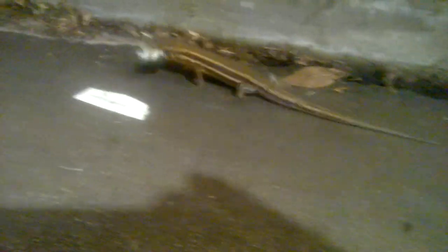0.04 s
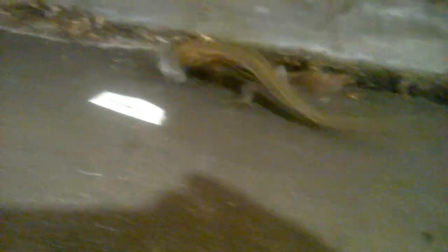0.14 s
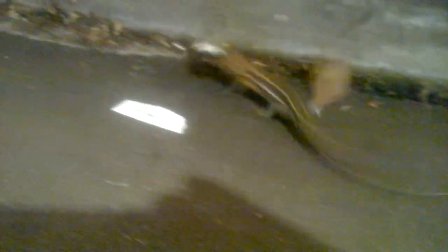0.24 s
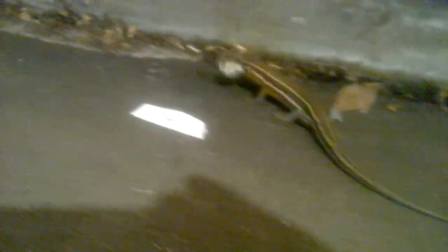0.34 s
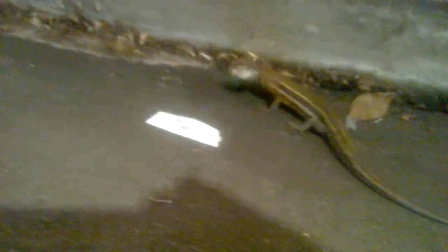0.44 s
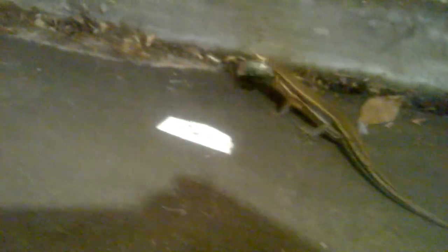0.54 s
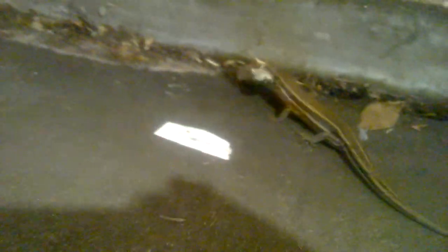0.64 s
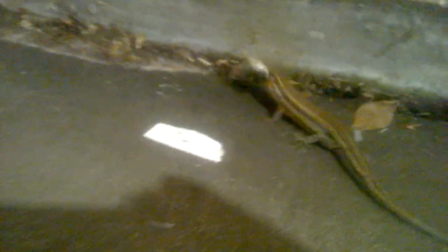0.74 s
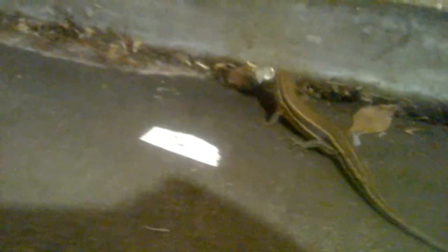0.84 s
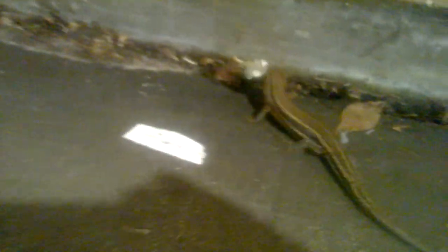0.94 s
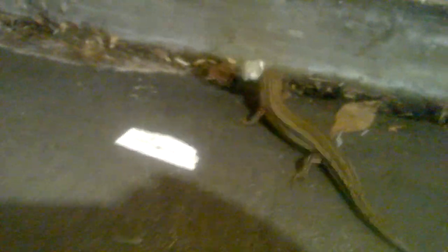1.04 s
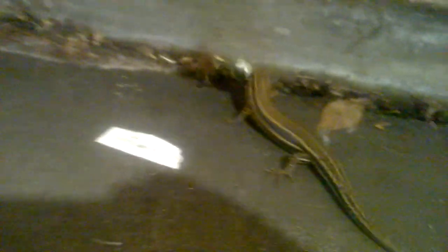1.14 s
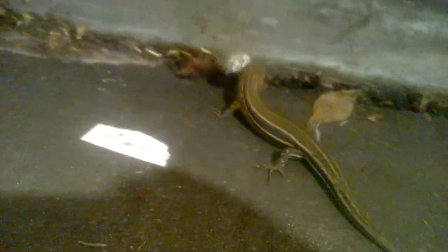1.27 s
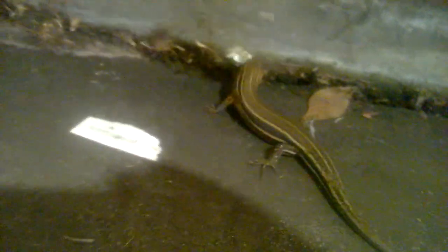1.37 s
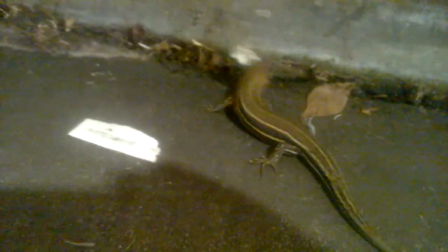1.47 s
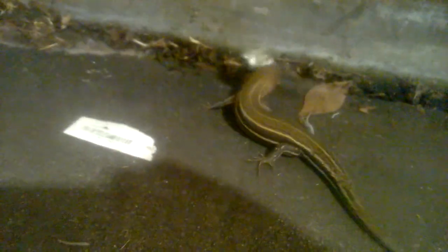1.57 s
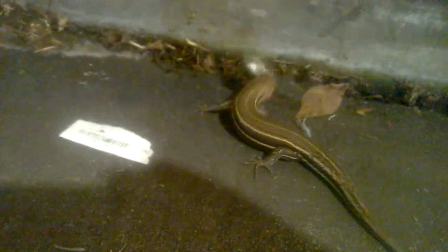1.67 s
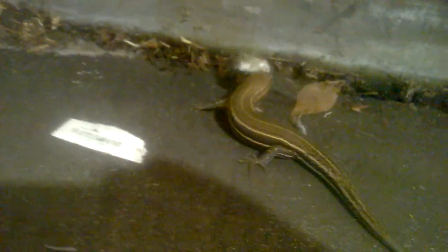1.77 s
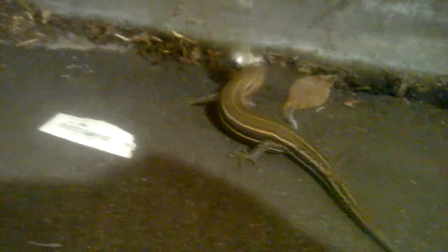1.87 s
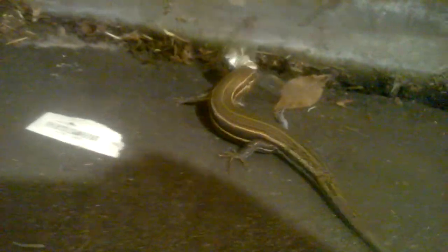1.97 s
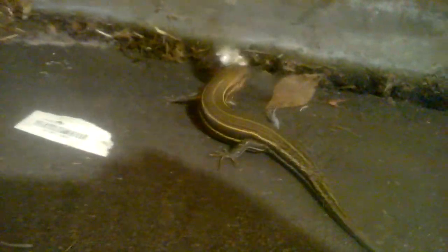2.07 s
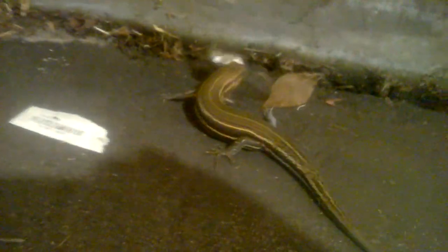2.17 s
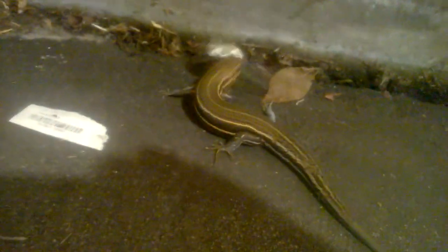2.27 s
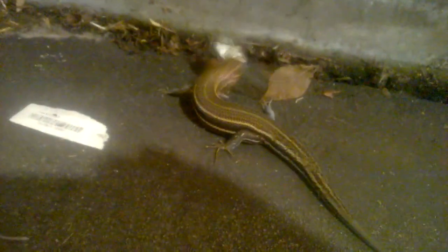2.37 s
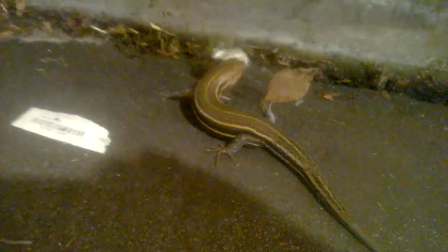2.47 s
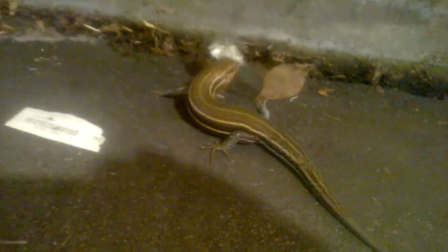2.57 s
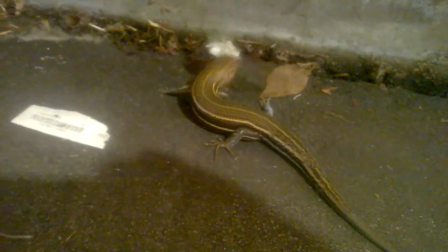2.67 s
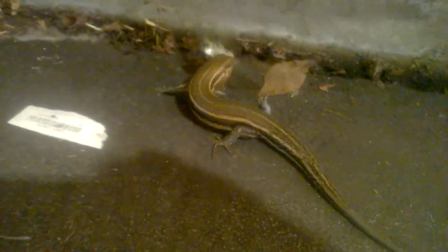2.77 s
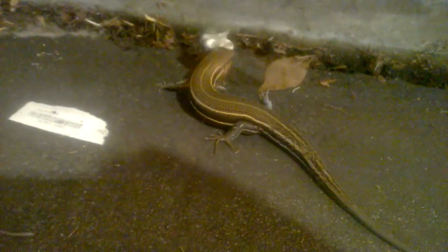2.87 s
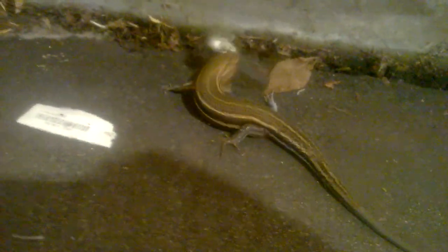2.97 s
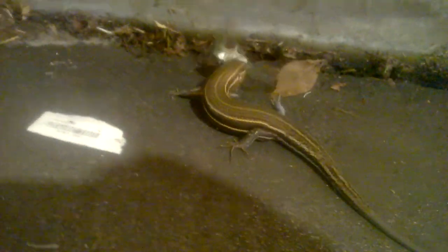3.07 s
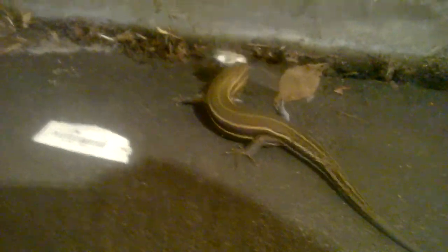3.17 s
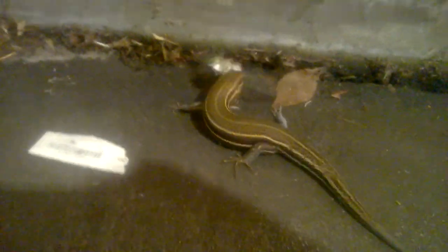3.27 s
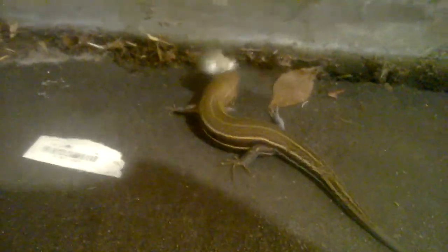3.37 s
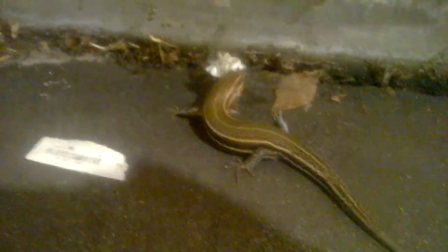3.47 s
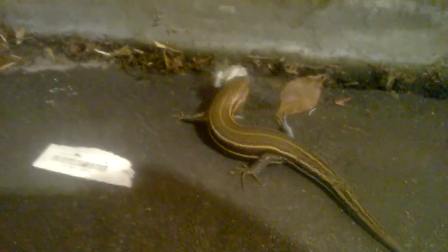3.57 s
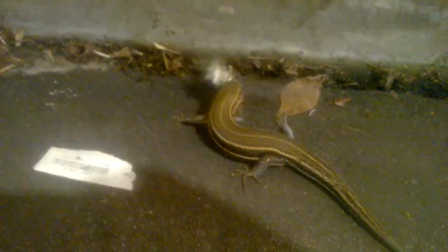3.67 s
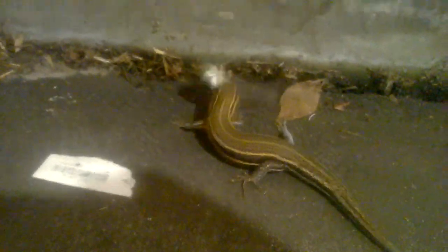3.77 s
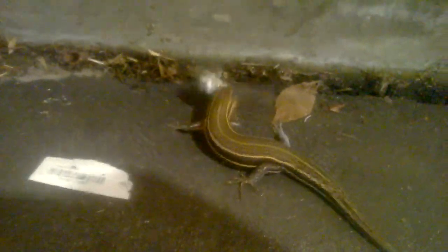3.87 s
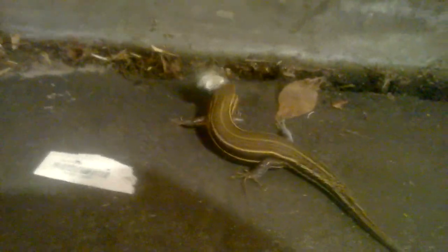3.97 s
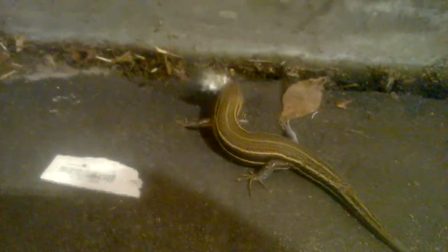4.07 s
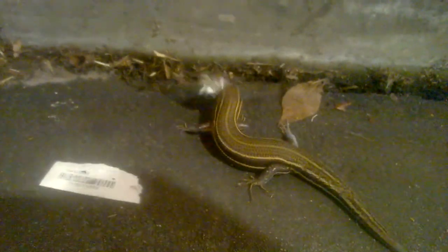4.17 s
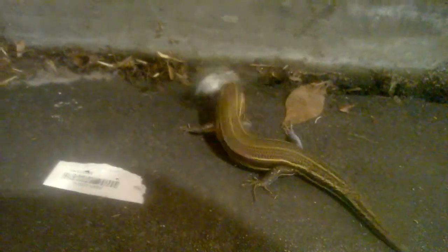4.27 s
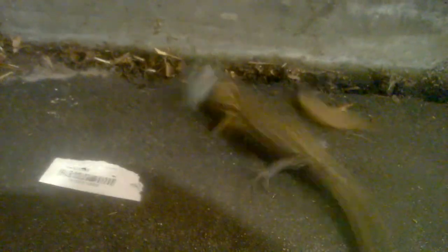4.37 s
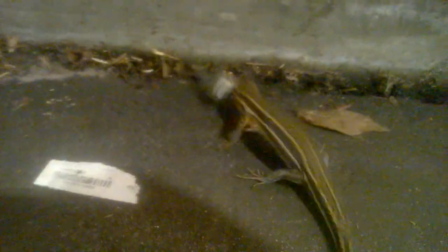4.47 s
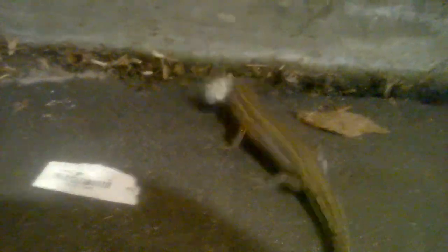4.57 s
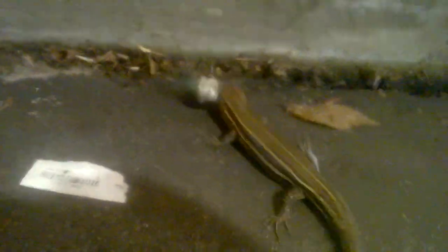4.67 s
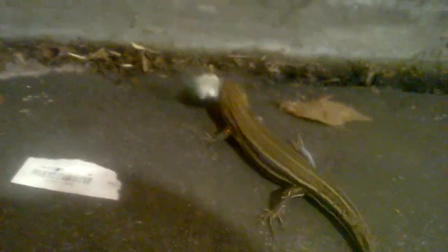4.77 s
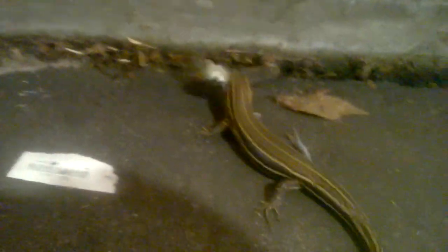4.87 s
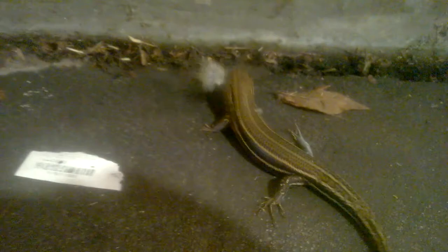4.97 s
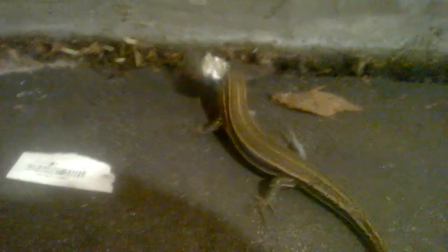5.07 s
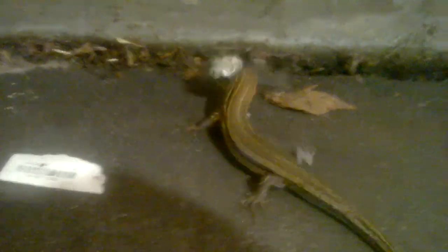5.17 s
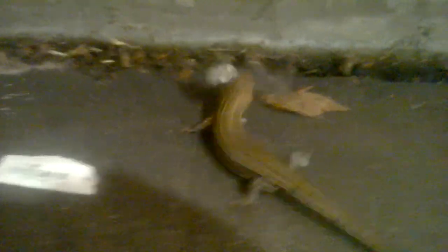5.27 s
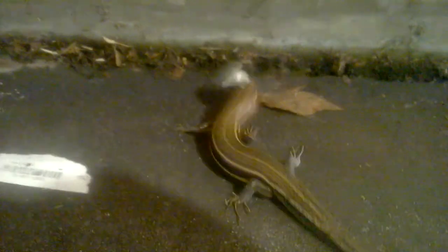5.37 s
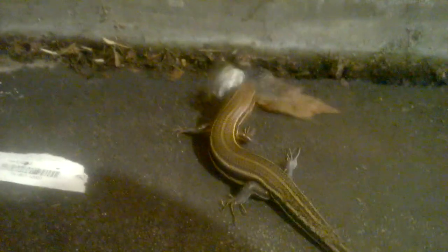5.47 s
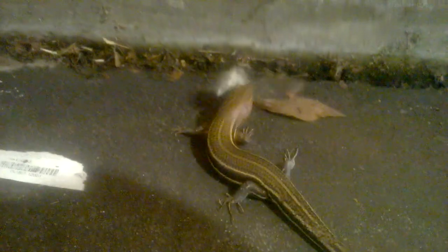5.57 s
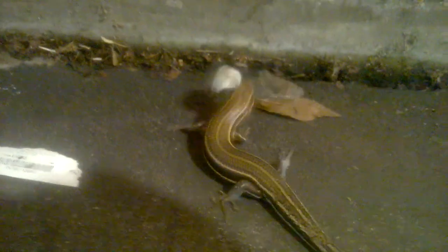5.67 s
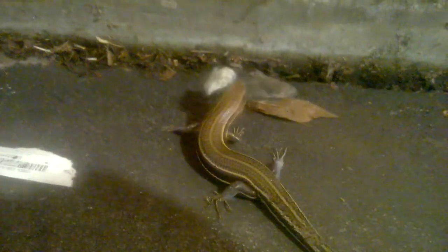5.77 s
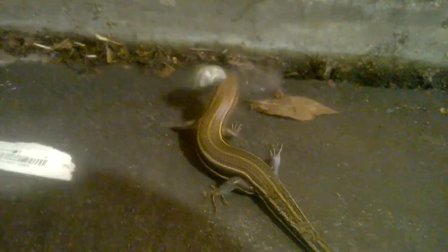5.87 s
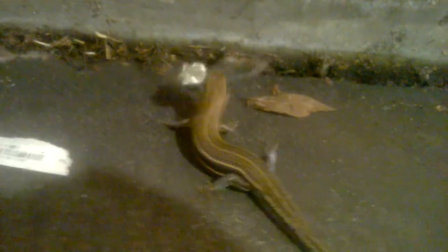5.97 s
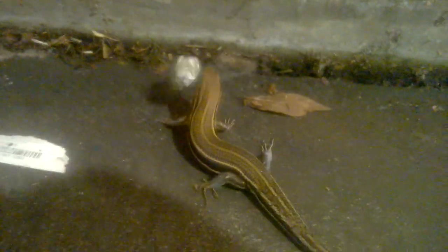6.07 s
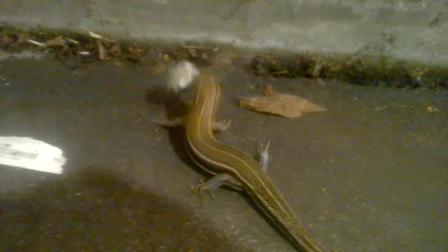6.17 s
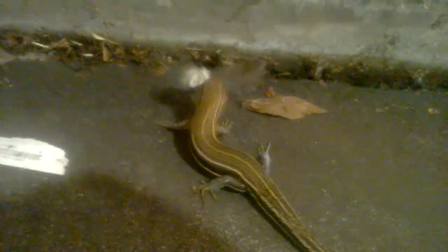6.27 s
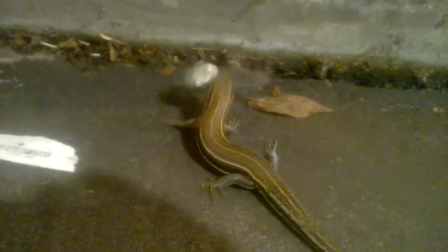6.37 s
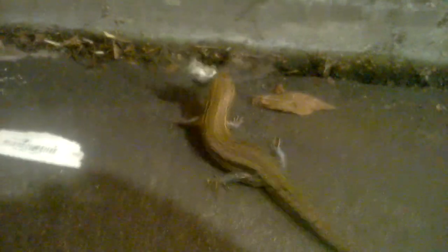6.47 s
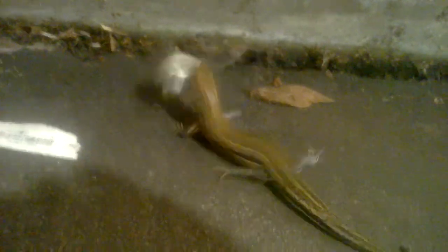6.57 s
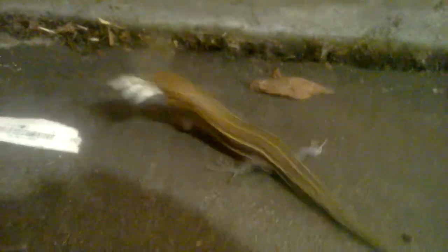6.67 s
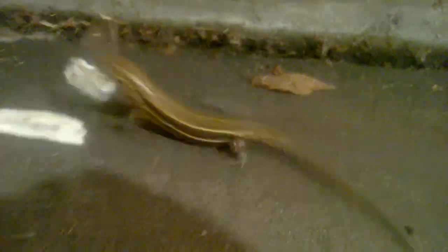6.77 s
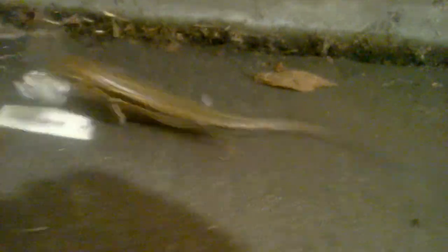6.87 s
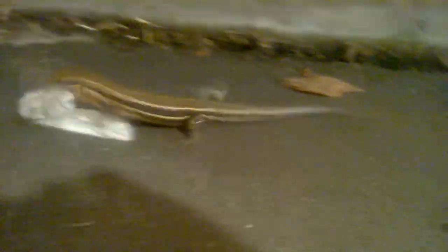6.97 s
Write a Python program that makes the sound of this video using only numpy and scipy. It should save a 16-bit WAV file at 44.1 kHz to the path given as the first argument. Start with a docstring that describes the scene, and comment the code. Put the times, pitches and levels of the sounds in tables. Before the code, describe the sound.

A small lizard thrashes brittle prey on concrete with hard cracks and gritty scrapes, then nips it in rapid crisp crunches over faint wind rumble.

```python
"""A small lizard shoves and bites brittle prey along a concrete step at night.
It first thrashes: hard fracture bursts, grit scraping and dull bumps; loose snaps follow, then a run of nips.
Each nip is a crunch, a rub and a second crunch. A second thrash comes past 4 s, then more snaps and nips.
Noise taps add a short bright tail throughout, over filtered-noise wind rumble, a few deep puffs and hiss."""
import sys
import numpy as np
from scipy import signal
from scipy.fft import rfft, irfft, next_fast_len
from scipy.io import wavfile
from scipy.ndimage import uniform_filter1d

SR = 44100
rng = np.random.default_rng(int(sys.argv[2]) if len(sys.argv) > 2 else 0)


def store_wav(level_fs):
    """Save 16-bit WAV to argv[1]."""
    pcm = np.round(np.clip(np.atleast_2d(level_fs), -1, 1) * 32767)
    wavfile.write(sys.argv[1], SR, pcm.T.astype(np.int16))


N = 310464  # samples

# Nips of the jaws. Each row: strike in seconds, grip in seconds, strike level in dB, release level in dB
# (both before a common trim), pitch in Hz of the piece that gives.
NIPS = [(.596, 0.031, -46.5, -46.5, 2800), (.749, .019, -54, -48.5, 5030), (1.462, .016, -50, -51.5, 4270),
        (1.546, 0.024, -50.5, -46.5, 4250), (1.637, .018, -51.5, -42.5, 3980),
        (1.685, 0.025, -49, -45.5, 3800), (1.84, 0.021, -50, -50.5, 5200),
        (1.918, 0.027, -40.5, -49.5, 3960), (2.067, .019, -49.5, -44, 4000),
        (2.145, 0.039, -43.5, -47, 3600), (2.237, 0.022, -40.5, -46.5, 3600),
        (2.318, 0.021, -45, -46.5, 3800), (2.379, 0.017, -42.5, -46, 3460),
        (2.517, 0.019, -47.5, -46.5, 3700), (2.559, 0.02, -41.5, -45, 3680), (2.661, 0.027, -46, -43, 4000),
        (2.794, 0.013, -51, -41.5, 4020), (2.874, .022, -46.5, -46, 3800), (2.982, .025, -45.5, -46, 3850),
        (3.162, 0.023, -44, -45.5, 4100), (3.405, 0.022, -44, -41.5, 2700),
        (3.647, 0.024, -45.5, -48.5, 2100), (5.15, 0.019, -40, -47, 4300), (5.477, 0.01, -46, -49.5, 4500),
        (5.533, 0.031, -43, -49, 2550), (5.608, .019, -44.5, -44, 3900), (5.637, .029, -40, -46, 2080),
        (5.741, 0.019, -43, -44.5, 3770), (5.837, 0.021, -43.5, -45, 2150), (5.923, 0.014, -46, -44, 1880),
        (6.132, 0.014, -46, -44.5, 1830), (6.212, .014, -40, -46.5, 1650), (6.298, 0.016, -45, -47, 4970),
        (6.421, 0.017, -50, -48.5, 2160), (6.625, 0.016, -44, -40.5, 4060),
        (6.671, 0.014, -36.5, -43, 3600), (6.81, 0.015, -47, -47, 3820), (6.853, .013, -43, -46, 3900),
        (6.9, 0.015, -48, -48, 3680)]
# Single snaps of shell. Each row: peak in seconds, level in dB before the same trim, pitch in Hz,
# fizz in dB over the body.
SNAPS = [(.1335, -38, 3940, -11), (0.1791, -19.5, 3700, 4.5), (0.1843, -18.5, 1800, -1.5),
         (0.2272, -17.5, 2360, -5), (0.456, -40.5, 4850, -7.5), (.5, -35, 4860, -6.5),
         (0.541, -41.5, 4420, 0.5), (0.826, -47.5, 4140, -1), (0.8741, -36.5, 4550, -3.5),
         (.977, -45, 2440, -14), (1.072, -50, 2660, 0), (1.153, -45, 3870, -12), (1.818, -51, 2500, -4),
         (2.761, -40.5, 3340, -13), (3.234, -48, 3800, 1), (3.328, -45.5, 4700, -12),
         (3.3777, -35.5, 2660, -7.5), (3.687, -39.5, 4400, -5.5), (3.752, -52, 5300, -5),
         (3.871, -48.5, 5300, -18), (3.964, -46, 3900, -1.5), (4.128, -36.5, 2140, -8.5),
         (4.25, -49, 5300, -16), (4.285, -49, 4000, -4.5), (4.4035, -24, 3900, -1.5),
         (4.4442, -22, 2750, -0.5), (4.5011, -34.5, 4600, -3), (4.525, -41.5, 5000, 5),
         (4.692, -48, 3100, -8), (4.755, -32, 2170, -3), (4.798, -43.5, 3860, 1), (4.859, -51.5, 4070, -4),
         (5.0478, -41, 4050, -3.5), (5.266, -41.5, 4770, -11), (5.752, -40, 2200, -14),
         (6.0383, -50.5, 4230, -8), (6.498, -45, 4650, -10), (6.579, -49, 5170, -10),
         (6.5992, -34, 4600, -8), (7.012, -37, 3330, -11.5)]
# Fizz of the nips, rising and falling over time, before the strike and release offsets.
# Each row: time in seconds, fizz in dB over the body.
CRISPNESS = [(.6, -5.5), (1.6, 0.5), (2.3, 1.5), (2.6, -3), (3.3, -3), (5.5, 1), (6, -10), (6.9, -1)]
# Rubs and drawn-out dull crunches of the prey. Each row: middle in seconds, level in dB before a trim,
# length in seconds, fizz in dB over the body.
RUBS = [(.01, -56.5, 0.028, -14), (.075, -66.5, 0.034, -2.5), (0.161, -39, 0.0088, -13),
        (0.21, -40.5, 0.0073, -14), (0.328, -44, 0.011, -3.5), (0.419, -60, 0.021, -3),
        (1.02, -62, 0.014, 3.5), (1.195, -63.5, 0.085, -0.5), (1.353, -58.5, 0.04, -5),
        (1.71, -57, 0.027, 4), (1.975, -61.5, 0.013, 5), (2.157, -62.5, 0.089, 0), (3.057, -61, 0.063, -1),
        (3.361, -60.5, 0.014, 4), (3.791, -67, 0.035, -2), (3.92, -61.5, 0.011, -6), (4.068, -65, .03, -5),
        (4.313, -61, 0.014, 2), (4.371, -42.5, 0.006, -15), (4.384, -40.5, 0.0073, -8),
        (4.456, -33.5, 0.0075, -7.5), (4.7, -64.5, .22, -4), (4.967, -64, 0.049, -5),
        (5.215, -56, 0.031, -9), (5.308, -57, .06, -6), (5.411, -55.5, 0.031, -3), (5.542, -51, 0.014, -6),
        (5.649, -61, 0.028, -4), (5.836, -52.5, 0.0098, -17), (6.064, -60.5, .02, -12),
        (7.03, -55, 0.018, -3)]
# Treble let out as the head turns to the step and away. Each row: time in seconds, gain in dB.
FACING = [(.25, -1), (.5, -10), (1.1, -1), (1.5, -7), (2, -11), (2.6, -1.5), (2.95, -8), (4.4, 2.5),
          (4.7, -6), (6.2, 5.5), (7, -0.5)]
# Scraping while the lizard thrashes, one list a bout. Each row: time in seconds, level in dB.
SCUFFLES = [
    [(.14, -44), (.16, -50), (.2, -45), (.22, -45), (.24, -36), (.257, -35.5), (.29, -60)],
    [(4.362, -50), (4.385, -45.5), (4.413, -38), (4.432, -51), (4.455, -39), (4.483, -52), (4.515, -44.5),
     (4.55, -52.5)],
]
# Body and prey bumping the ground. Each row: peak of the push in seconds, level in dB, nominal length in seconds,
# pitch in Hz.
BUMPS = [(0.179, -34.5, 0.0036, 1130), (0.226, -43, 0.004, 1300), (4.446, -47.5, 0.0056, 240),
         (4.451, -47.5, 0.018, 700), (5.209, -55.5, 0.037, 670), (6.686, -46.5, 0.0074, 1270)]
# Puffs of wind on the microphone. Each row: peak in seconds, level in dB.
PUFFS = [(1.575, -50.5), (2.325, -47.5), (5.855, -44), (6.37, -45)]
# Filter shapes of shell, breaking edges, grit, wind, hiss and tail; overall level is set elsewhere.
# Each row: frequency in Hz, relative gain in dB.
SHELL_SHAPE = [(150, -10.5), (500, -24), (850, -13), (1250, -2.5), (1750, 1.5), (2700, 0), (4000, 1),
               (5300, 1.5), (6200, -5), (7200, -7.5), (9000, -34.5)]
EDGE_SHAPE = [(4500, -52), (6800, -9), (8200, 2), (9800, 1.5), (11200, -3), (13000, -6), (16000, -4)]
GRIT_SHAPE = [(200, -23.5), (600, -18.5), (1100, -11), (1750, -1.5), (2700, -5), (4200, -8.5), (5400, -10),
              (6400, -18), (8400, -6), (12000, -7.5), (16000, -11)]
RUMBLE_SHAPE = [(8, -15), (21, -4.5), (40, -5.5), (64, 1), (74, -7.5), (81, 3), (93, -10), (110, -0.5),
                (130, -2.5), (143, -15), (200, -18), (400, -29.5), (1000, -77)]
HISS_SHAPE = [(60, 8), (300, 1), (430, 0), (780, 4), (1150, -1), (1600, -4.5), (2600, -6.5), (4200, -4.5),
              (6500, -8), (10000, -23), (16000, -20)]
TAIL_SHAPE = [(200, 8), (900, -0.5), (1700, -4), (2700, 0.5), (3300, -2), (3800, 3.5), (4700, -6.5),
              (7000, 6), (8700, 4), (10500, 3.5), (13000, 0.5), (16000, 4.5)]
# Decay of the tail. Each row: frequency in Hz, time in seconds to fall 60 dB.
TAIL_DECAY = [(300, 0.13), (1800, 0.093), (4000, 0.19), (9000, 0.12), (15000, 0.093)]

STRIKE_FIZZ_DB, RELEASE_FIZZ_DB = -2, 2.5  # added to CRISPNESS
GRIP_DB, GRIP_SHARE, GRIP_FIZZ_DB = -12.5, 1.2, 0  # level re mean crunch, length re grip, fizz re CRISPNESS
BAND_LIMIT_HZ = 15800


def amp(db):
    """Decibels to amplitude."""
    return 10 ** (np.asarray(db) / 20)


def unit(x):
    """Scale to an RMS of 1."""
    return x / np.sqrt(np.mean(x ** 2) + 1e-20)


def track(points, t_s):
    """Interpolate a table linearly over time."""
    return np.interp(t_s, *np.transpose(points))


def read(points, hz):
    """Interpolate a table on a log-frequency axis."""
    f_hz, value = np.transpose(points)
    return np.interp(np.log(hz + 1), np.log(f_hz + 1), value)


def add(mix, start_s, sound):
    """Mix a sound in place, cut at the end of the mix."""
    part = mix[max(round(start_s * SR), 0):][:len(sound)]
    part += sound[:len(part)]


def colour(x, shape, ring_hz=1000, ring_db=0, ring_share=.1):
    """Minimum-phase filter: a shape plus one resonance, so that clicks start sharply and ring out."""
    size = 2 * next_fast_len(len(x))
    hz = np.fft.rfftfreq(size, 1 / SR)
    detune = (hz - ring_hz) / (ring_share * ring_hz)
    ring = 1 + (amp(ring_db) - 1) / (1 + detune ** 2)
    cepstrum = irfft(np.log(amp(read(shape, hz)) * ring))
    # folding the cepstrum makes the filter causal
    cepstrum[1:size // 2] *= 2
    cepstrum[size // 2 + 1:] = 0
    return irfft(rfft(x, size) * np.exp(rfft(cepstrum)))[:len(x)]


def fractures(per_s, spread_db, size):
    """Sparse impulses of either sign; sizes are exponential in dB, so most are small and a few large."""
    chance, sign, strength = rng.random((3, size))
    size_db = spread_db * np.minimum(-np.log(1 - strength), 3.5)
    return (chance < per_s / SR) * np.sign(sign - .5) * amp(size_db)


def swell(t_s, length_s, rise, fall):
    """Stress grows exponentially to a peak at t = 0 and dies away; rise and fall are shares of the length."""
    return np.exp(np.where(t_s < 0, t_s / (rise * length_s), -t_s / (fall * length_s)))


def bites(trim_db=-1.67):
    """Each nip crunches twice, dull as the jaws strike, crisp as they let go; single pieces snap too."""
    blows = list(SNAPS)
    for s, grip_s, strike_db, release_db, hz in NIPS:
        crisp_db = track(CRISPNESS, s)
        blows.append((s, strike_db, hz, crisp_db + STRIKE_FIZZ_DB))
        blows.append((s + grip_s, release_db, hz, crisp_db + RELEASE_FIZZ_DB))
    out = np.zeros(N)
    for s, db, hz, fizz_db in blows:
        lead_s, sound = crunch(db + trim_db, hz, fizz_db)
        add(out, s - lead_s, sound)
    return out


def crunch(db, hz, fizz_db, size=2048):
    """A cluster of fractures rings one piece of shell; the breaking edges fizz above it."""
    lead_s = .012
    # hard snaps are brief, fizzy ones drawn out
    length_s = 0.0042 * np.exp(0.022 * fizz_db - 0.032 * (db + 47.5))
    t_s = np.arange(size) / SR - lead_s
    snaps = swell(t_s + 0.22 * length_s, length_s, rise=0.25, fall=0.88)
    snaps = snaps * fractures(per_s=6800, spread_db=5.0, size=size)
    splinters = swell(t_s + 0.16 * length_s, length_s, rise=0.31, fall=0.63)
    splinters = splinters * fractures(per_s=13000, spread_db=1.0, size=size)
    body = unit(colour(snaps, SHELL_SHAPE, ring_hz=hz, ring_db=9.0, ring_share=0.11))
    edge_hz = rng.uniform(9100, 13000)
    fizz = unit(colour(splinters, EDGE_SHAPE, ring_hz=edge_hz, ring_db=1, ring_share=0.122))
    level = amp(db) * np.sqrt(length_s * SR / size)  # energy follows length
    return lead_s, level * (body + amp(fizz_db) * fizz)


def crumbs(level_db=-58, fizz_db=-5, spread_db=5, early_s=.04, late_s=0.076, count=130):
    """Claws and flakes tick faintly, as small crunches at random around the nips and snaps."""
    out = np.zeros(N)
    moves_s = [row[0] for row in NIPS + SNAPS]
    for move, delay, size, piece, edge in rng.random((count, 5)):
        tick_db = level_db + spread_db * (2 * size - 1)
        lead_s, tick = crunch(tick_db, 1600 + 3600 * piece, fizz_db + 14 * (edge - .5))
        s = moves_s[int(move * len(moves_s))] - early_s + delay * (early_s + late_s)
        add(out, s - lead_s, tick)
    return out


def rustle(trim_db=3.5):
    """The prey rubs or crunches dully at listed times, and rubs in the jaws around the end of every grip."""
    out = np.zeros(N)
    for s, db, length_s, fizz_db in RUBS:
        add(out, *rub(s, db + trim_db, length_s, fizz_db, rng.uniform(1700, 4710)))
    for s, grip_s, strike_db, release_db, hz in NIPS:
        grip_db = (strike_db + release_db) / 2 + GRIP_DB
        fizz_db = track(CRISPNESS, s) + GRIP_FIZZ_DB
        add(out, *rub(s + grip_s, grip_db, GRIP_SHARE * grip_s, fizz_db, hz))
    return out


def rub(s, db, length_s, fizz_db, hz, clump_db=5.0, size=16384):
    """A spindle of fine grains that catch and slip in clumps, ringing one piece of shell."""
    t_s = (np.arange(size) - size // 2) / SR
    clumps = amp(clump_db * unit(uniform_filter1d(rng.standard_normal(size), size=260)))
    spindle = np.exp(-np.pi / 2 * (t_s / length_s) ** 2)
    grains = fractures(per_s=9900, spread_db=5.0, size=size) * clumps * spindle
    body = unit(colour(grains, SHELL_SHAPE, ring_hz=hz, ring_db=9.0, ring_share=0.097))
    fizz = unit(colour(grains, EDGE_SHAPE))
    sound = amp(db) * np.sqrt(length_s * SR / size) * (body + amp(fizz_db) * fizz)
    return s + t_s[0], sound[s + t_s >= 0]  # drop what falls before time zero


def shade(x):
    """The lizard's head and the step shadow the shortest waves: a moving gain above 11.5 kHz."""
    top = signal.oaconvolve(x, signal.firwin(31, 11500, pass_zero=False, fs=SR), "same")
    return x + top * (amp(track(FACING, np.arange(N) / SR)) - 1)


def scuffle():
    """Scales and prey drag over grit: dense grains under each stroke."""
    t_s = np.arange(N) / SR
    force = np.zeros(N)
    for bout in SCUFFLES:
        force += amp(np.interp(t_s, *np.transpose(bout), left=-140, right=-140))
    return force * unit(colour(fractures(per_s=5200, spread_db=2.5, size=N), GRIT_SHAPE))


def bumps(size=8192):
    """Soft, dull knocks: a swell of noise through one broad, heavily damped resonance."""
    out = np.zeros(N)
    t_s = (np.arange(size) - size // 2) / SR
    for s, db, length_s, hz in BUMPS:
        push = rng.standard_normal(size) * swell(t_s, length_s, rise=0.44, fall=0.25)
        thud = colour(push, [(hz / 8, -20), (hz / 2, -9), (hz, 0), (2 * hz, -11), (8 * hz, -50)])
        add(out, s + t_s[0], amp(db) * np.sqrt(length_s * SR / size) * unit(thud))
    return out


def bright_tail(x, wet_db=-7.5, build_s=0.0068, count=3):
    """A short bright tail holds briefly, then falls ever faster; tails crossfade steadily."""
    out = np.zeros(N)
    for k in range(count):
        taps = rng.standard_normal(SR) * (rng.random(SR) < 5000 / SR)
        hz, t_s, z = signal.stft(taps, SR, nperseg=256)
        fade_db = 60 * (t_s / read(TAIL_DECAY, hz)[:, None]) ** 1.7
        z = z * amp(read(TAIL_SHAPE, hz)[:, None] - fade_db)
        tail = signal.istft(z, SR, nperseg=256)[1][:SR]
        tail = tail * (1 - np.exp(-np.arange(SR) / SR / build_s))
        # squares of the shares sum to 1
        share = np.sqrt(2 / count) * np.cos(np.pi * (2 * np.arange(N) / SR + k / count))
        out += signal.oaconvolve(x * share, tail / np.linalg.norm(tail))[:N]
    return amp(wet_db) * out


def night(rumble_db=-56.0, hiss_db=-63.5, gust_db=1.6, growth_db=2.5, puff_s=0.019):
    """Wind rumbles in gusts (2-9 Hz sines) and a few deep puffs over a faint even hiss."""
    t_s = np.arange(N) / SR
    gusts = np.zeros(N)
    for f_hz in np.geomspace(2, 9, 20):
        gusts += np.sin(2 * np.pi * (f_hz * t_s + rng.random())) / np.sqrt(f_hz)
    wind_db = rumble_db + gust_db * unit(gusts) + growth_db * (t_s / t_s[-1] - .5)
    rumble = amp(wind_db) * unit(colour(rng.standard_normal(N), RUMBLE_SHAPE))
    push = sum(amp(db) * np.exp(-((t_s - s) / puff_s) ** 2) for s, db in PUFFS)
    puffs = push * unit(colour(rng.standard_normal(N), [(10, -17.0), (60, 13), (400, -56.0)]))
    hiss = amp(hiss_db) * unit(colour(rng.standard_normal(N), HISS_SHAPE))
    return rumble + puffs + hiss


def scene():
    """Lizard and prey, their bright tail, and the night, as one channel."""
    lizard = shade(bites() + crumbs() + rustle()) + scuffle() + bumps()
    return (lizard + bright_tail(lizard) + night())[None]


def record(dry):
    """The recorder's band limit: a steep linear-phase low-pass."""
    low_pass = signal.firwin(511, BAND_LIMIT_HZ, window=("kaiser", 9), fs=SR)
    return signal.oaconvolve(dry, low_pass[None], "same")


dry = scene()
out = record(dry)
store_wav(out)
```